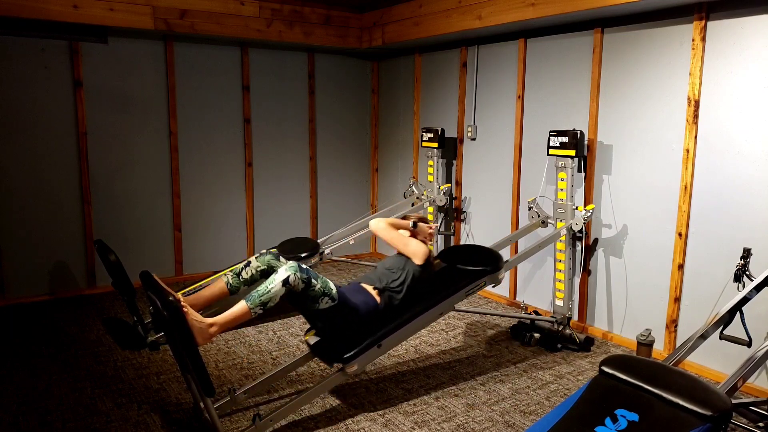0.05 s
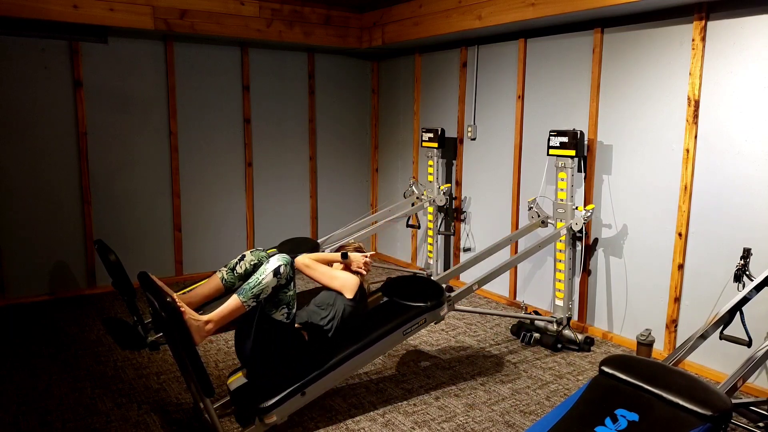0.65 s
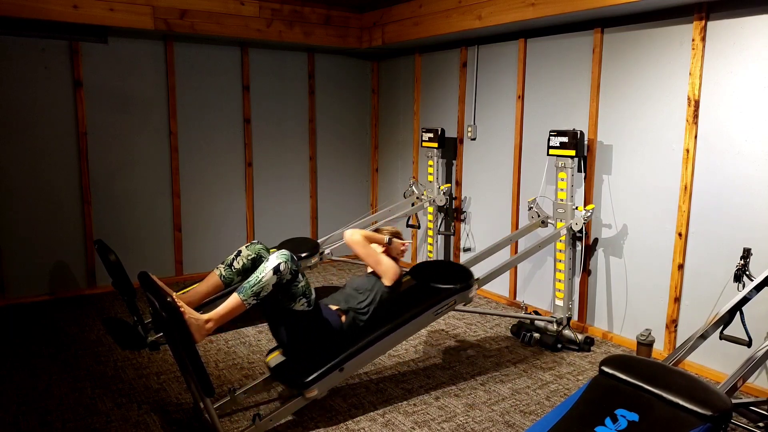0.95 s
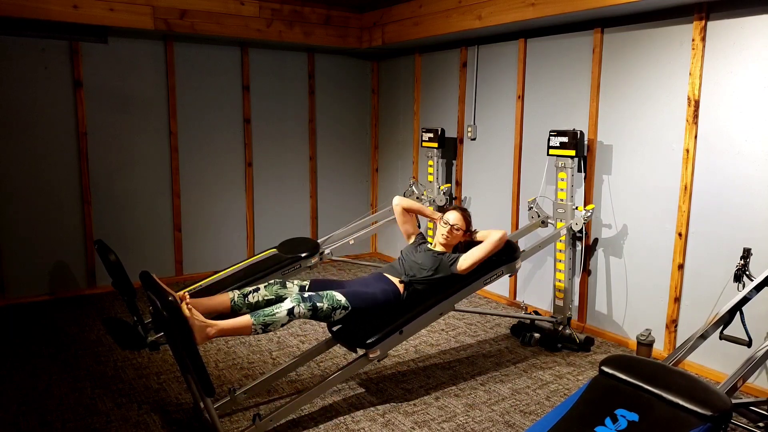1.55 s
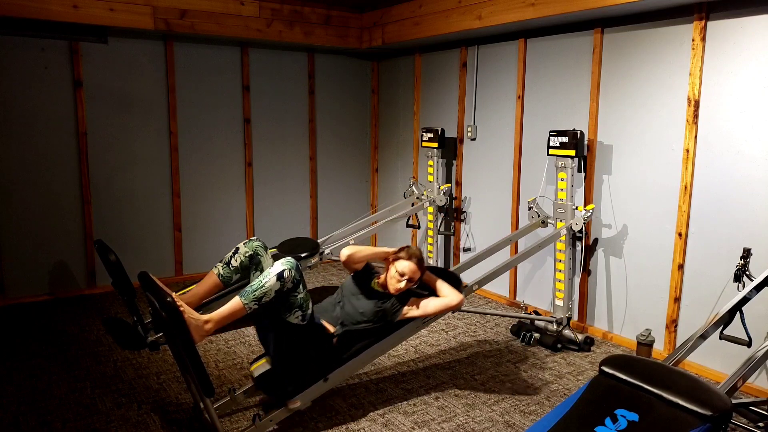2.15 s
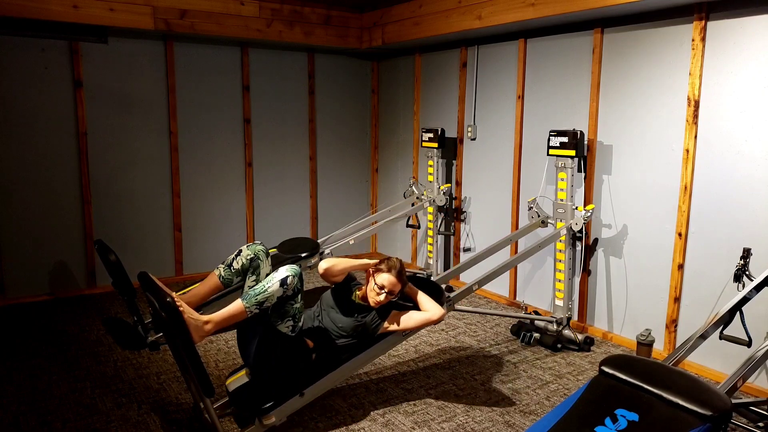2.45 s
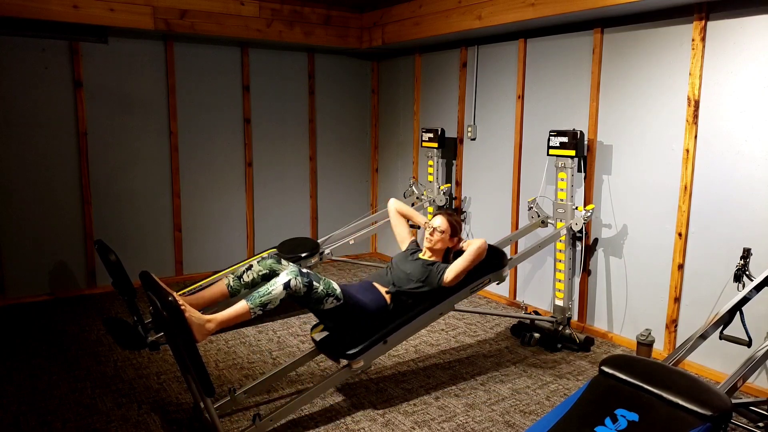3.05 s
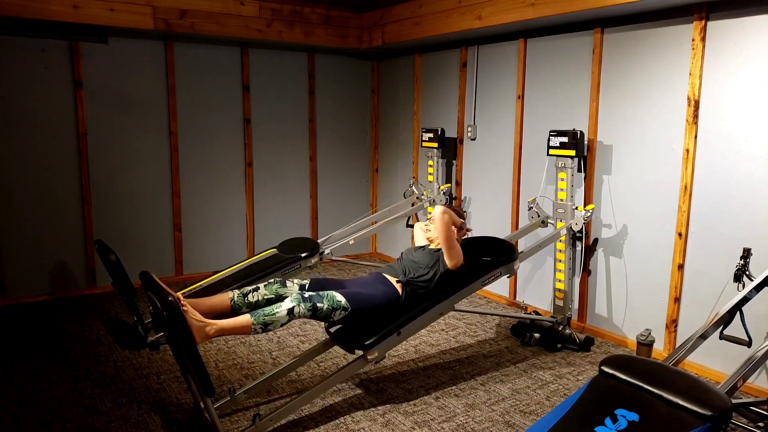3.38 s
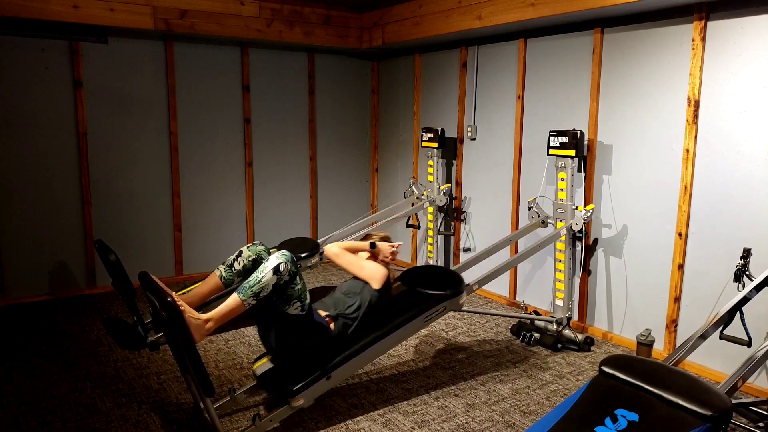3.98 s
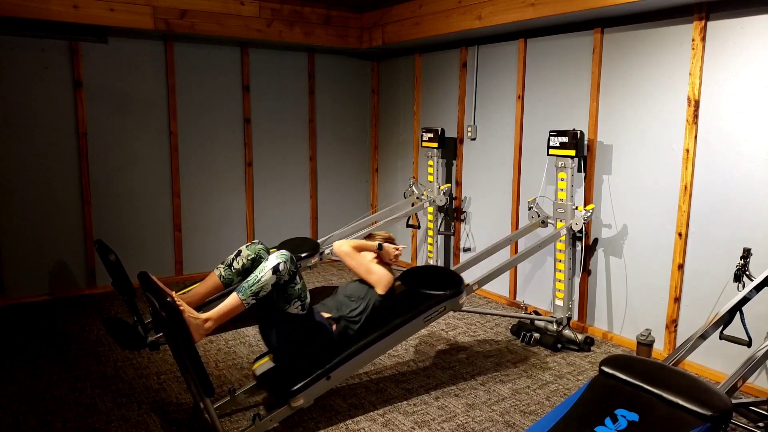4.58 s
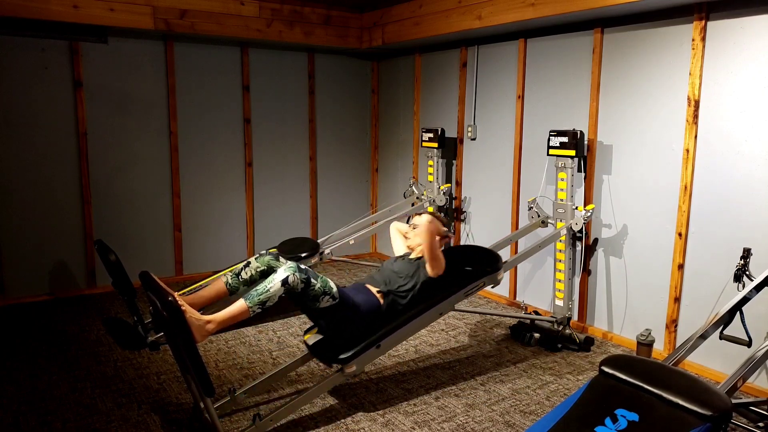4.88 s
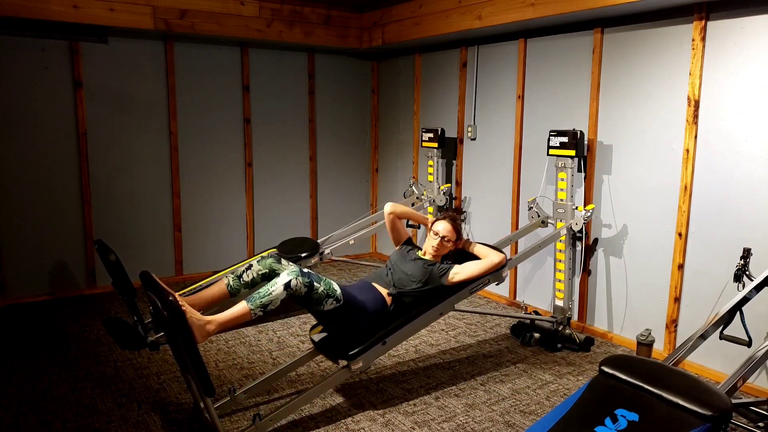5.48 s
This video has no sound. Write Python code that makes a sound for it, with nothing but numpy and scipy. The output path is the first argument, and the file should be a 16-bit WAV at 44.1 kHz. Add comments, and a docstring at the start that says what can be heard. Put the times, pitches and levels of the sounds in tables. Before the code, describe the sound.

In a small, bare room, an exercise machine's board rolls down and up inclined rails, its wheels rumbling and softly hissing with each stroke. The metal frame clacks with a brief ring at the start and then about every two seconds, while loose fittings click in between. The last stroke is softer. A distant motor hums over a low rush of air throughout, and the machine sounds brighter on the left.

```python
"""An exercise machine in a small, bare room, facing the left microphone of a stereo pair.
From the start a motor hums somewhere off in the house, over a low rush of air. The frame clacks and a
glideboard sets off down and up its inclined rails, wheels rumbling and hissing with each stroke.
From 1.2 s loose fittings click; from 2.3 s the wheels tick over flaws and, at one turn, whine faintly.
The frame clacks again near 1.6, 3.6 and 5.5 s, the last time during a softer, final stroke."""
import sys
import numpy as np
from scipy import signal
from scipy.fft import rfft, irfft, next_fast_len
from scipy.io import wavfile

SR = 44100
rng = np.random.default_rng(int(sys.argv[2]) if len(sys.argv) > 2 else 0)


def transcribe(u):
    """Save the signal u as a 16-bit wav file named by the first command-line argument.

    u: samples, shape (n,) or (channels, n), limited to [-1, 1]; the rate is SR.
    q: integer samples, one column per channel.
    """
    v = np.clip(np.atleast_2d(u).T, -1, 1)
    q = np.round(v * 32767).astype(np.int16)
    wavfile.write(sys.argv[1], SR, q)


N = 252693
TIME = np.arange(N) / SR

# The bare room's reverberation. Each row: frequency in Hz, time to fall 60 dB in seconds.
ROOM_T60 = [(200, 1), (1000, 0.61), (3000, 0.39), (7000, 0.37), (14000, 0.22)]
# How alike the room sounds at the two microphones. Each row: frequency in Hz, coherence from 0 to 1.
COHERENCE = [(60, 1), (130, 0.92), (260, 0.95), (520, 0.56), (1000, 0), (14000, 0)]
# The balance of the pair. Each row: frequency in Hz, left minus right in dB.
MIC_TILT = [(60, 2.5), (400, 1.75), (1200, 2), (2800, 4), (4500, 1.5), (6500, 9.5), (8000, 14), (9800, 7),
            (12000, 1), (14500, -8.5)]

# Spectra of the room's air and the microphones' hiss. Each row: frequency in Hz, relative level in dB.
AIR_COLOUR = [(22, -36), (34, -29), (48, -7.5), (68, 0), (105, -5.5), (140, -4), (240, -14.5), (400, -21.5),
              (720, -24.5), (1000, -32), (1300, -63.5), (1900, -46), (2600, -81), (5000, -74)]
MIC_HISS_COLOUR = [(1500, -6), (4000, -8), (5100, -9), (5500, -1), (6600, 4), (7400, -10.5), (8400, -19.5),
                   (9500, -8), (12000, -10), (14500, -14.5)]
# The motor's hum, heard from the room. Each row: multiple of the shaft speed, level in dB.
HUM_TONES = [(2, -57.7), (3, -51), (4, -48), (5, -42), (6, -49)]
# The whirr beside it. Each row: frequency in Hz, level in dB.
WHIRR_TONES = [(221, -56), (720, -64)]

# The board's strokes, down and up in turn. Each row: start in seconds, length in seconds,
# then rumble and hiss at full speed, both in relative dB.
STROKES = [(-0.03, 0.8, -37.5, -58), (0.745, 0.91, -39.5, -59), (1.727, 0.98, -42.5, -62),
           (2.547, 0.93, -43, -60.5), (3.633, 0.83, -38, -59.5), (4.447, 0.85, -39.5, -60),
           (5.37, 0.65, -46, -71)]
# Spectra of the board's rumble and the rails' hiss. Each row: frequency in Hz, relative level in dB.
RUMBLE_COLOUR = [(40, -24), (110, -4.5), (170, -4.5), (260, 1.5), (400, -6), (520, -10.5), (750, -21.5),
                 (1100, -26), (1600, -34.5), (2100, -39.5), (4000, -61.5)]
RAIL_HISS_COLOUR = [(1000, -14), (2030, -11), (2180, -0.5), (2450, -2), (2900, 0), (3600, -10.5),
                    (4700, -11), (5600, -5.5), (6300, 6), (6900, -1.5), (8200, -16.5), (9700, -5.5),
                    (11000, -6.5), (14500, -17.5)]
# Resonances heard in the rails' hiss; the bright peak near 6.5 kHz is the left microphone's.
# Each row: frequency in Hz, bandwidth in Hz, relative level in dB.
HISS_PEAKS = [(2200, 66, -5.5), (2384, 250, -9), (6700, 490, -15), (9600, 390, -10)]
# Wheels scuffing slowly near a turn. Each row: start in seconds, length in seconds, level in dB.
SCUFFS = [(1.88, 0.26, -73), (2.35, 0.49, -70), (4.418, 0.28, -70.5)]

# The frame's clacks. Each row: start in seconds, knock and metal snap in relative dB,
# the snap's lead on the knock in seconds.
CLACKS = [(0.0005, -35, -33, 0), (1.557, -35, -34, .0025), (3.6240, -32.8, -34, .003),
          (5.4725, -35, -31.5, .001)]
# Spectra of the snap and the knock. Each row: frequency in Hz, relative level in dB.
SNAP_COLOUR = [(1000, -53), (2500, -16), (4800, -7), (5700, -4.5), (6500, 4.5), (7100, -5.5), (7600, -9),
               (8500, -11.5), (9200, -1.5), (10500, -5.5), (12500, -5.5), (14500, -19)]
KNOCK_COLOUR = [(150, -29.5), (300, 1.5), (490, -2), (580, -3), (720, 0.5), (1100, -2.5), (1320, -2),
                (1480, -3.5), (1850, -7), (2000, -10), (2200, -8.5), (2500, -15), (4000, -17.5),
                (8000, -44)]
# The frame's ring. Each row: frequency in Hz, relative level in dB, time to fall 60 dB in seconds.
FRAME_MODES = [(497, -4, .45), (700, -10, .3), (738, -10, .3), (913, -12, .3), (1257, -13, .35),
               (1297, -2, .38), (1339, -9, .35), (1366, -4, .38), (1515, -15, .35), (1685, -17, .3),
               (1805, -14, .37), (1922, -16, .37), (2712, -17, .38)]

# The fittings' clicks. Each row: start in seconds, relative level in dB, chatter time in seconds.
CLICKS = [(1.21, -45.5, 0.0048), (1.2449, -37.5, 0.005), (1.7866, -33, 0.00094), (2.9905, -40.5, 0.0038),
          (3.0297, -37, 0.0034), (3.0927, -36, 0.0039), (4.922, -38.5, 0.0036), (5.4608, -38.5, 0.0049)]
# A click's spectrum. Each row: frequency in Hz, relative level in dB.
CLICK_COLOUR = [(500, -20), (1600, -12.5), (2200, -7.5), (3200, -5), (4400, -5.5), (5500, -2), (6500, 2.5),
                (7500, -7), (8500, -12.5), (9200, -8), (10500, -2), (12500, -3), (14500, -5.5)]
# Resonances heard in the clicks; the peak near 6.5 kHz is again the left microphone's.
# Each row: frequency in Hz, bandwidth in Hz, relative level in dB.
CLICK_PEAKS = [(3724, 39, -18), (6460, 88, -15.5), (9310, 440, -8), (13600, 460, -31)]

# Wheels meeting flaws in the rail. Each row: start in seconds, relative level in dB.
RAIL_TICKS = [(2.3306, -57.5), (2.916, -56), (3.5742, -73), (3.9534, -53), (4.4112, -59.5)]
# A tick's spectrum. Each row: frequency in Hz, relative level in dB.
TICK_COLOUR = [(1500, -6.5), (4500, -11.5), (5600, -4), (6500, 3.5), (8200, -15), (9700, -5), (12000, -9),
               (14500, -22)]
# A wheel's whines. Each row: start in seconds, length in seconds, pitch in Hz, relative level in dB.
WHINES = [(2.35, 0.34, 1934, -70), (2.64, 0.32, 1900, -70)]


def amp(db):
    """Decibels to gain."""
    return 10 ** (np.asarray(db) / 20)


def unit(x):
    """Scales to rms 1."""
    return x / np.sqrt(np.mean(x ** 2) + 1e-20)


def read(points, hz):
    """Reads a table on a log-frequency axis."""
    table_hz, value = np.transpose(points)
    return np.interp(np.log(hz + 1), np.log(table_hz + 1), value)


def add(mix, start, sound):
    """Mixes a stereo sound in at a start in seconds."""
    part = mix[:, max(round(start * SR), 0):][:, :sound.shape[1]]
    part += sound[:, :part.shape[1]]


def drift(rate_hz):
    """Smooth random motion of rms 1."""
    size = next_fast_len(N)
    hz = np.fft.rfftfreq(size, 1 / SR)
    spectrum = rfft(rng.standard_normal(size)) * np.exp(-(hz / rate_hz) ** 2)
    return unit(irfft(spectrum, size)[:N])


def arch(start, length):
    """One movement: from rest up to 1 and back to rest."""
    return np.sin(np.pi * np.clip((TIME - start) / length, 0, 1))


def tone(hz, waver=0.38, wander_rad=0.37):
    """A sine of rms near 1 that wavers in level and phase."""
    level = np.sqrt(2) * (1 + waver * drift(3.4))
    return level * np.sin(2 * np.pi * (hz * TIME + rng.random()) + wander_rad * drift(3.6))


def resonate(x, hz, width_hz):
    """One resonance, scaled to rms 1."""
    return unit(signal.lfilter(*signal.iirpeak(hz, hz / width_hz, fs=SR), x))


def colour(x, spectrum, size=4096):
    """Minimum-phase filter of energy 1 with the given spectrum."""
    log_gain = np.log(amp(read(spectrum, abs(np.fft.fftfreq(size, 1 / SR)))))
    response = np.exp(np.conj(signal.hilbert(log_gain)))
    taps = np.fft.ifft(response).real[:size // 2]
    return signal.oaconvolve(x, taps[None] / np.linalg.norm(taps), axes=1)[:, :x.shape[1]]


def diffuse_noise(size):
    """Noise reaching the pair from all sides: alike in the bass, unrelated in the treble."""
    left, other = rfft(rng.standard_normal((2, size)))
    coherence = read(COHERENCE, np.fft.rfftfreq(size, 1 / SR))
    right = coherence * left + np.sqrt(1 - coherence ** 2) * other
    return irfft(np.array([left, right]), size)


def room(hold_s, rise_s, size=30000):
    """Dense reflections off bare walls build up, hold briefly and die band by band."""
    hz, t, bands = signal.stft(diffuse_noise(size), SR, nperseg=256)
    fade = amp(-60 * np.maximum(t - hold_s, 0) / read(ROOM_T60, hz)[:, None])
    tail = signal.istft(bands * fade, SR, nperseg=256)[1][:, :size]
    return tail * (1 - np.exp(-np.arange(size) / SR / rise_s))


def strike(chatter_s, spectrum, direct_db, hold_s, rise_s):
    """A short chatter of contact, heard direct and off the walls, in the given colour."""
    tail = room(hold_s, rise_s)
    t = np.arange(tail.shape[1]) / SR
    chatter = rng.standard_normal(len(t)) * np.exp(-(t / chatter_s) ** 2)
    facing = np.array([[1], [.2]])  # the machine faces the left microphone
    return colour(tail + amp(direct_db) * facing * chatter, spectrum)


def room_tone(air_db=-44, hiss_db=-69.5, swell_db=1):
    """The low, uneven rush of moving air and the microphones' own hiss."""
    air = unit(colour(diffuse_noise(N), AIR_COLOUR, size=16384))
    hiss = unit(colour(rng.standard_normal((2, N)), MIC_HISS_COLOUR))
    return amp(air_db + swell_db * drift(1.5)) * air + amp(hiss_db) * hiss


def motor(shaft_hz=18.87, sag_at_s=3.44, sag_width_s=0.39, sag_db=-7.5):
    """Off in the house, a motor whirrs faintly and hums at multiples of its shaft speed."""
    dip_db = sag_db * np.exp(-((TIME - sag_at_s) / sag_width_s) ** 2)
    loudest_db = max(db for _, db in HUM_TONES)  # only the strongest tone dips
    hum = sum(amp(db + dip_db * (db == loudest_db)) * tone(order * shaft_hz) for order, db in HUM_TONES)
    whirr = sum(amp(db) * tone(hz) for hz, db in WHIRR_TONES)
    return hum + whirr


def board_rumble(gain_db=-1, judder_db=0.47, split_hz=300, brighten=0.1, usual_db=-41, rest_db=-51):
    """The wheels shake the board; the faster it rolls, the louder and brighter the rumble."""
    rolling = sum(amp(db) * arch(start, length) ** 1.74 for start, length, db, _ in STROKES)
    drive_db = 20 * np.log10(np.hypot(rolling, amp(rest_db)))
    shake = unit(colour(diffuse_noise(N), RUMBLE_COLOUR))
    low = signal.sosfiltfilt(signal.butter(2, split_hz, fs=SR, output="sos"), shake)
    high = (shake - low) * amp(brighten * (drive_db - usual_db))
    return (low + high) * amp(drive_db + gain_db + judder_db * drift(25))


def rail_hiss(gain_db=1, sing_db=-1, grit_db=3, bumps_per_s=2500, sing_lag_s=0.021, scuff_hz=5200):
    """Tiny bumps under the wheels make the hollow rails hiss; resonances follow. Scuffs are thin hiss."""
    # the hiss grows almost with the cube of the board's speed
    rolling = sum(amp(db) * arch(start, length) ** 2.96 for start, length, _, db in STROKES)
    rolling_late = np.interp(TIME - sing_lag_s, TIME, rolling)
    scuffing = sum(amp(db) * arch(start, length) for start, length, db in SCUFFS)
    bumps = (rng.random(N) < bumps_per_s / SR) * rng.standard_normal(N)
    bumps *= amp(grit_db * np.minimum(rng.exponential(1, N), 4))  # a few stand out as grit
    reflected = signal.oaconvolve(room(hold_s=0.0068, rise_s=0.00093), bumps[None], axes=1)[:, :N]
    hiss = unit(colour(reflected, RAIL_HISS_COLOUR))
    sing = sum(amp(db + sing_db) * resonate(hiss, hz, width) for hz, width, db in HISS_PEAKS)
    roll = (hiss * rolling + sing * rolling_late) / np.std(hiss + sing)
    scuff = signal.sosfilt(signal.butter(2, scuff_hz, "high", fs=SR, output="sos"), hiss)
    return amp(gain_db) * roll + unit(scuff) * scuffing


def frame_clacks(snap_gain_db=-7, knock_gain_db=-4, ring_gain_db=-0.5, ring_rise_s=0.003):
    """Metal snaps on metal; the frame takes a dull knock, and its ringing builds up in the room."""
    out = np.zeros((2, N))
    t = np.arange(SR) / SR
    for start, knock_db, snap_db, lead_s in CLACKS:
        snap = strike(0.0011, SNAP_COLOUR, direct_db=8, hold_s=0.0061, rise_s=0.0035)
        knock = strike(0.0022, KNOCK_COLOUR, direct_db=1, hold_s=0.035, rise_s=0.0022)
        add(out, start - lead_s, amp(snap_db + snap_gain_db) * snap)
        add(out, start, amp(knock_db + knock_gain_db) * knock)
        swell = amp(knock_db + ring_gain_db) * (1 - np.exp(-t / ring_rise_s))
        for hz, mode_db, t60 in FRAME_MODES:
            # each mode reaches the two microphones a quarter cycle apart
            cycles = hz * t + rng.random() + rng.choice([-1, 1]) * np.array([[0], [1 / 4]])
            add(out, start, swell * amp(mode_db - 60 * t / t60) * np.sin(2 * np.pi * cycles))
    return out


def fitting_clicks(gain_db=-7):
    """Loose metal fittings snap over as the load shifts; a brief ring is heard in each click."""
    out = np.zeros((2, N))
    for start, db, chatter_s in CLICKS:
        snap = strike(chatter_s, CLICK_COLOUR, direct_db=8, hold_s=0.019, rise_s=0.004)
        ring = sum(amp(peak_db) * resonate(snap, hz, width) for hz, width, peak_db in CLICK_PEAKS)
        click = np.std(snap) * unit(unit(snap) + ring)  # as strong as the snap alone
        add(out, start, amp(db + gain_db) * click)
    return out


def rail_ticks(gain_db=-4):
    """A wheel ticks as it crosses a flaw in the rail."""
    out = np.zeros((2, N))
    for start, db in RAIL_TICKS:
        tick = strike(0.0051, TICK_COLOUR, direct_db=4.5, hold_s=0.03, rise_s=0.0022)
        add(out, start, amp(db + gain_db) * tick)
    return out


def wheel_whine(width_hz=75):
    """A wheel sings faintly and roughly as it slows into one turn and as it sets off again."""
    out = np.zeros((2, N))
    for start, length, hz, db in WHINES:
        phase = 2 * np.pi * hz * TIME
        for channel in out:
            narrow_noise = drift(width_hz) * np.cos(phase) + drift(width_hz) * np.sin(phase)
            channel += amp(db) * arch(start, length) * narrow_noise
    return out


def scene():
    """The machine at work in the room, over the hum of the house."""
    impacts = fitting_clicks() + rail_ticks() + frame_clacks()
    wheels = board_rumble() + rail_hiss() + wheel_whine()
    return impacts + wheels + motor() + room_tone()


def record(dry):
    """The stereo pair: the left microphone is the brighter one, and both cut off near 14.6 kHz."""
    tilt_db = read(MIC_TILT, np.fft.rfftfreq(N, 1 / SR))
    mic_gains = amp(np.array([tilt_db, -tilt_db]) / 2)
    heard = irfft(rfft(dry) * mic_gains, N)
    lowpass = signal.firwin(511, 14620, window=("kaiser", 9), fs=SR)
    return signal.oaconvolve(heard, lowpass[None], "same")


dry = scene()
out = record(dry)
transcribe(out)
```